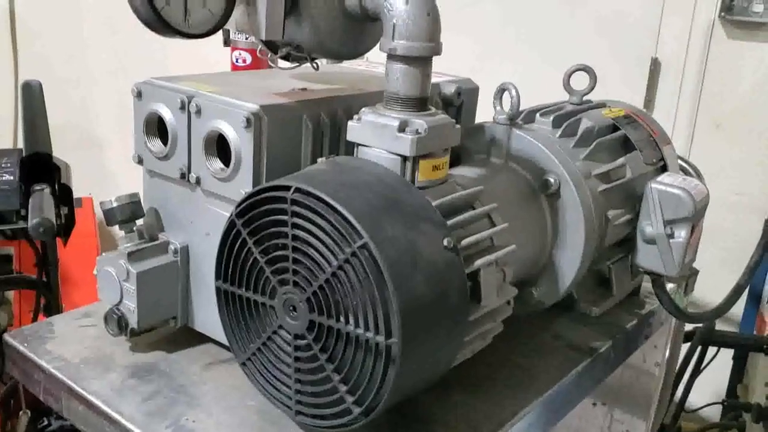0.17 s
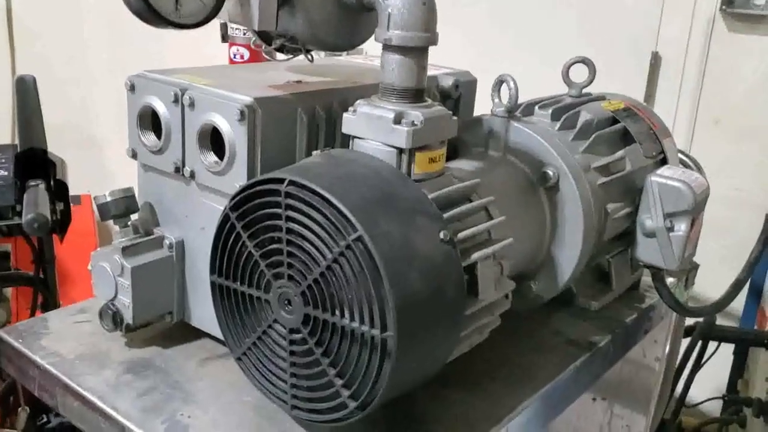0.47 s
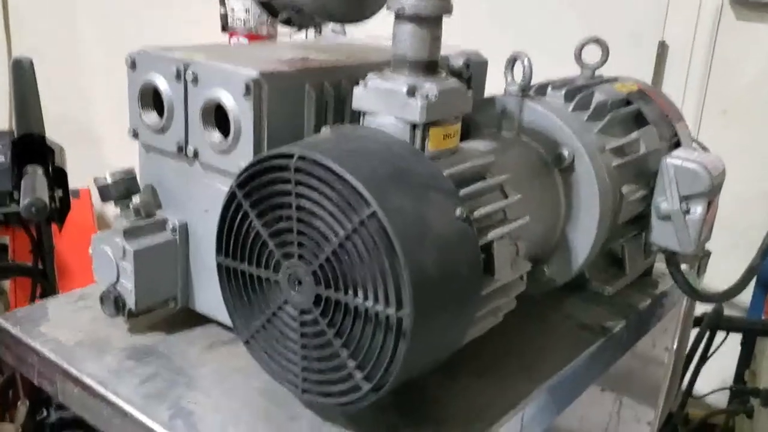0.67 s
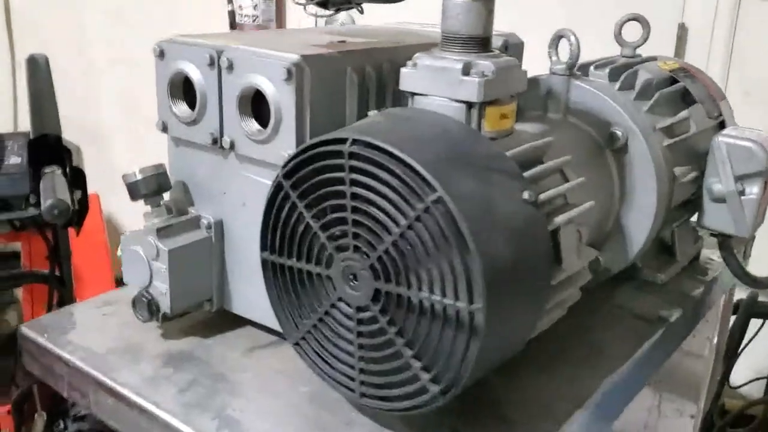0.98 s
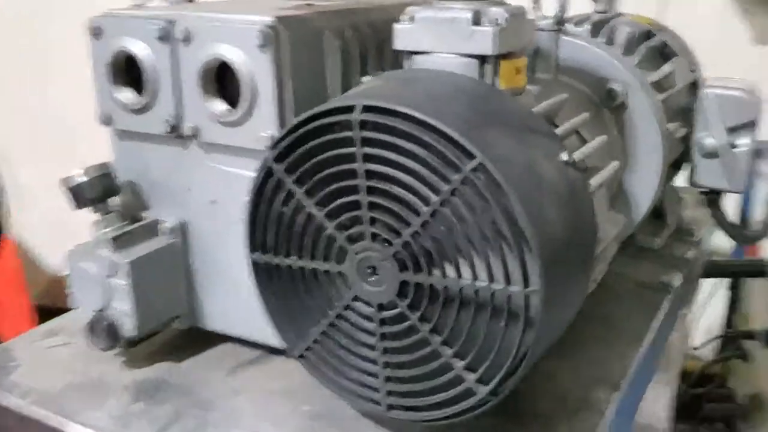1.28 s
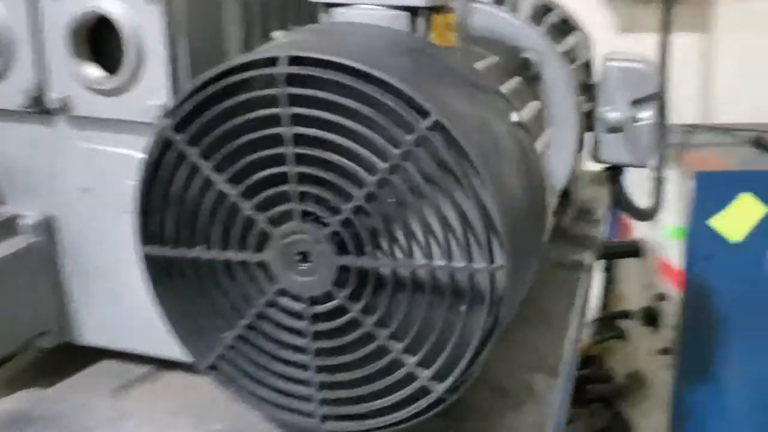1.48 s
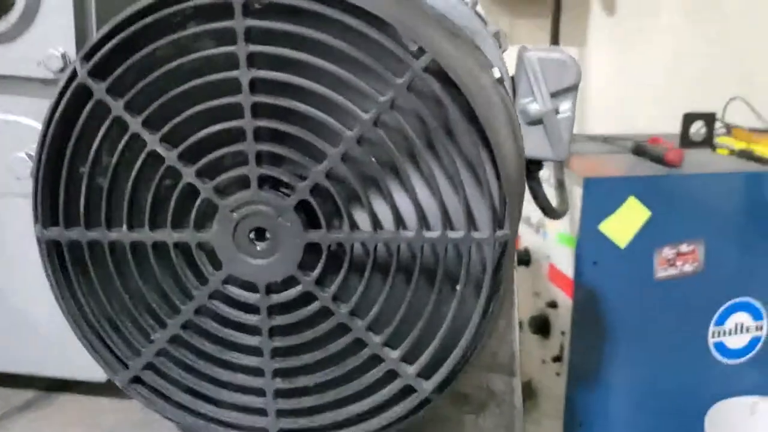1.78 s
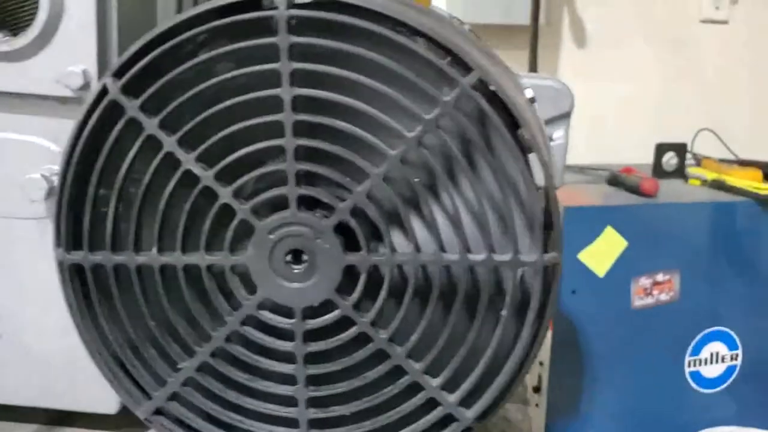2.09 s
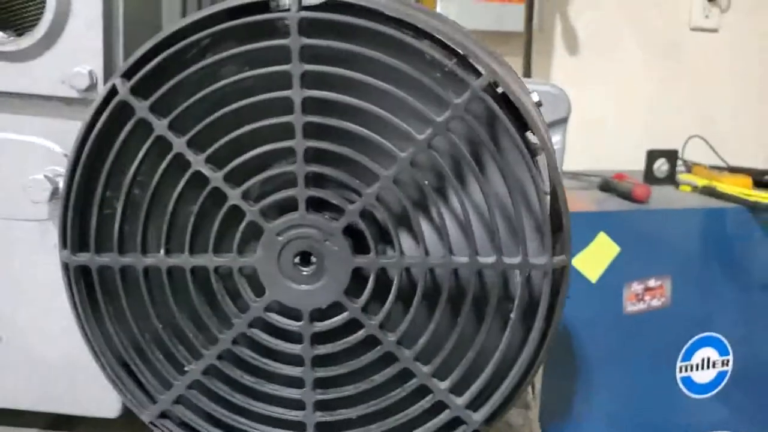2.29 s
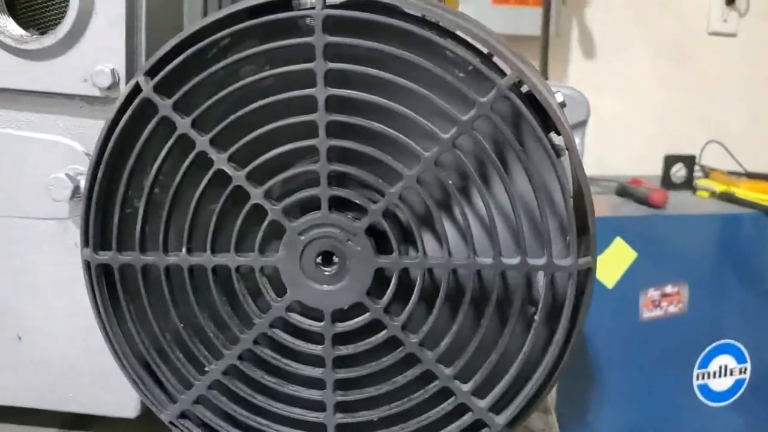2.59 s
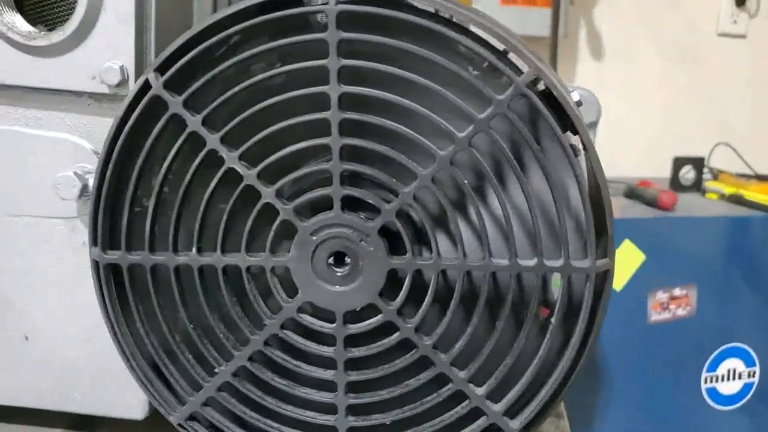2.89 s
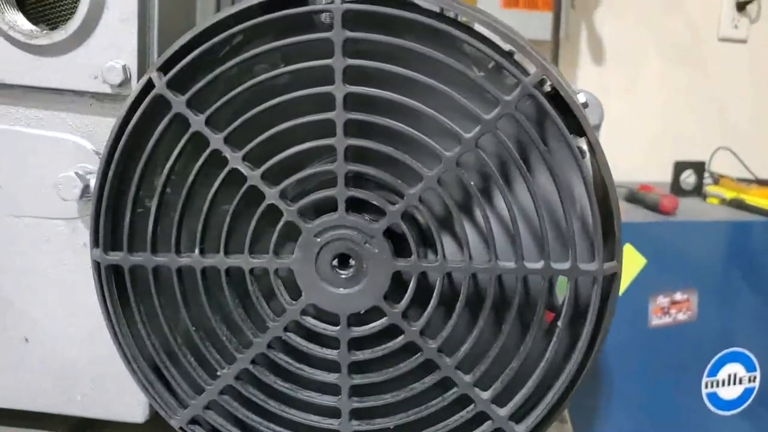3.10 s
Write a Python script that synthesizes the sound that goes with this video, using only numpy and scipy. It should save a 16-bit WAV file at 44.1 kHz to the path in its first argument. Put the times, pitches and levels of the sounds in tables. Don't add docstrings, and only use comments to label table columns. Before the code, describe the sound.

A vacuum pump, already running, starts abruptly at about 0.13 s: a steady mechanical drone, very rapid uneven vane knocks blurring into a metallic rattle, and dull rushing air in a live workshop. From about 1 to 2 s the microphone approaches the fan; whirring tones, casing ring and roar swell, leaning left. From 2 s to 3.2 s it stays loud and close, with turbulent fan air and little treble.

```python
import sys
import numpy as np
from scipy import signal
from scipy.fft import rfft, irfft
from scipy.io import wavfile
from scipy.ndimage import uniform_filter1d

SR = 44100
rng = np.random.default_rng(int(sys.argv[2]) if len(sys.argv) > 2 else 0)


def invert_db(x):
    u = np.asarray(x, float) / 20
    return 10 ** u


def waveform_to_disk(signal):
    frames = np.transpose(np.atleast_2d(signal))
    scaled = np.clip(frames, -1, 1) * 32767
    samples = np.round(scaled).astype(np.int16)
    wavfile.write(sys.argv[1], SR, samples)


N = 142884

# time_s, closeness (0 far - 1 near)
CLOSENESS = [(0.099, 0.19), (0.599, 0.16), (1.001, 0.26), (1.2, 0.42), (1.35, 0.56), (1.6, 0.84),
             (1.899, 0.89), (2.1, 0.95), (2.5, 0.99), (2.801, .97), (3.24, 0.94)]
# time_s, facing (0 aside - 1 facing)
FACING = [(.1, 0.), (1., 0.), (1.22, 0.52), (1.45, 0.77), (1.8, 0.88), (2.2, 0.88), (2.6, 0.87),
          (3.24, 0.96)]
# order (multiple of shaft rate), far_db, near_db, left_right_db
SHAFT_ORDERS = [(3, -55, -50, 0), (4, -66, -58, 1), (6, -56, -46, 1), (8, -54, -38, 5), (9, -47, -49, 1),
                (10, -61, -52, 2), (12, -51, -48, 2), (14, -58, -50, 3), (15, -55, -40, 2),
                (16, -49, -34.5, 4), (17, -49, -44, 6), (21, -55, -54, 5), (23, -52, -59, 4),
                (24, -41, -40, 6), (29, -51, -48, 5), (32, -42, -34.5, 4), (36, -51, -56, 3),
                (40, -44, -41, 2), (42, -49, -45, 5), (48, -52, -44, 3)]
# pitch_hz, far_db, near_db, left_right_db
MOTOR_TONES = [(71.7, -57, -53, 5.5), (81.7, -51, -52, -1.5), (93.6, -66.5, -61, -8),
               (980.9, -54.5, -45, 9), (2185, -55.5, -51.5, 15), (2910, -71, -75, -4.5)]
# place (0-1 turn), far_db, near_db
VANE_BLOWS = [
    (.02, -5, -8),
    (.425, 0, 0),
    (.79, -1.5, -3),
]
# time_s, level_db
SLAP = [(0.099, -1.), (.3, -2.5), (.45, 2.5), (.55, -4), (.67, 1.5), (.85, -1.5), (1.1, -1.5), (1.3, 2.5),
        (1.55, -2.5), (1.72, 2.5), (1.9, -4.5), (2.1, 2.5), (2.3, 0.5), (2.55, -0.5), (2.75, -1.5),
        (2.97, 0.5), (3.24, -1.5)]
# pitch_hz, width_hz, far_db, near_db, left_right_db
CASING_MODES = [(469, 170, -46, -35.5, 0.5), (722, 310, -40, -43, -4), (893, 94, -49, -47, -0.5),
                (1042, 90, -41, -65.5, 7), (1254, 154, -38, -36.5, 1.5), (1416, 60, -51, -41, -2),
                (1482, 96, -37, -35.5, 1.5), (1720, 74, -49, -46, 14), (1966, 81, -54, -44, -15.5),
                (2238, 99, -45, -36.5, 3.5), (2742, 180, -68.5, -58, 22), (3593, 1000, -47, -45.5, 5.5),
                (5230, 470, -70.5, -54, 19), (6100, 2000, -54, -51.5, 18)]
# pitch_hz, density_db (per Hz)
AIR_FAR = [(30, -27.5), (75, -19), (130, -12), (500, -9.5), (1500, -7.5), (2500, -17), (4600, -25.5),
           (6400, -23.5)]
# pitch_hz, density_db (per Hz)
AIR_NEAR = [(30, -20.5), (230, -9), (320, -18), (480, -12.5), (1200, -7), (2500, -17), (4600, -21.5),
            (6400, -26)]
# pitch_hz, likeness (0-1)
AIR_COHERENCE = [(60, 0.96), (170, 0.87), (470, 1), (1300, 1), (3640, 0.4), (10200, 0.03)]
# pitch_hz, left_right_db
AIR_BALANCE = [(40, 0.5), (110, -2.5), (250, 2.5), (600, 10), (1800, 6.5), (3300, 8.5), (5700, 7),
               (9000, 0.5)]
# pitch_hz, level_db
MIC_RESPONSE = [(6500, 0.5), (7000, -5.5), (7320, -15), (7500, -7), (8500, -5.5), (9700, -2), (9900, -4),
                (10080, -18)]

TIME_S = np.arange(N) / SR
START_S, SHAFT_HZ = 0.1272, 29.691
TONE_SPREAD_TURNS, WAVER_TURNS, WAVER_DB = 0.065, 0.02, 1.5
BLOW_JITTER_S, BLOW_S, BLOW_SPREAD_DB = 0.00012, 0.00029, 2.8
RATTLE, LOW_RATTLE, STRUCK_FROM_HZ = 0.55, 0.9, 1000
RATTLE_ALIKE, RING_ALIKE = 0.55, 0.72
SMACK_HZ, SMACK_WIDTH_HZ, SMACK_PAN_DB = 1495, 340, -1
SMACK_FAR_DB, SMACK_NEAR_DB = -42.5, -37
AIR_FAR_DB, AIR_NEAR_DB = -35, -24
PATCH_DB, GUST_DB, SWELL_DB, BLADE_CHOP = 2, 1.5, 0.4, 0.1
ROOM_T60_S, ROOM_GAP_S, ROOM_WIDE_HZ = 0.66, 0.006, 496
ROOM_FAR_DB, ROOM_NEAR_DB = -3, -5.5
GATE_FROM_HZ, GATE_BELOW_DB = 6950, -2.8


def blend(far, near, walk=CLOSENESS):
    t, close = np.transpose(walk)
    return far + (near - far) * np.interp(TIME_S, t, close)


def read(points, hz):
    f, value = np.transpose(points)
    return np.interp(np.log(hz + 1), np.log(f + 1), value)


def evened(x):
    return x / np.sqrt(np.mean(x ** 2) + 1e-20)


def drift(top_hz):
    t = np.arange(0, N, 256) / SR
    f = np.geomspace(0.3, top_hz, num=16)[:, None]
    waves = np.sin(2 * np.pi * (f * t + rng.random(f.shape))) / f ** 0.65
    return np.interp(TIME_S, t, evened(waves.sum(0)))


def sides(pan_db):
    return invert_db(np.array([[pan_db / 2], [-pan_db / 2]]))


def ring(x, hz, width_hz):
    r = np.exp(-np.pi * width_hz / SR)
    poles = [1, -2 * r * np.cos(2 * np.pi * hz / SR), r * r]
    once = signal.lfilter([1, 0, -1], poles, x)
    return evened(signal.lfilter([1, 0, -1], poles, once))


def tone(hz, far_db, near_db, pan_db):
    turns = hz * TIME_S + rng.random() + WAVER_TURNS * drift(6)
    lead = TONE_SPREAD_TURNS * rng.standard_normal() * np.array([[0.5], [-0.5]])
    level = invert_db(blend(far_db, near_db, FACING) + WAVER_DB * drift(17))
    return np.sqrt(2) * level * sides(pan_db) * np.sin(2 * np.pi * (turns + lead))


def rotor_tones():
    shaft = sum(tone(order * SHAFT_HZ, *rest) for order, *rest in SHAFT_ORDERS)
    return shaft + sum(tone(*row) for row in MOTOR_TONES)


def vane_blows():
    blows = np.zeros(N)
    turn = np.arange(int(N / SR * SHAFT_HZ) - 1)
    slap_db = blend(0, 0.94, SLAP)
    for place, far_db, near_db in VANE_BLOWS:
        jitter, spread = rng.standard_normal((2, len(turn)))
        blow_s = (turn + place) / SHAFT_HZ + BLOW_JITTER_S * jitter
        at = np.clip(blow_s * SR, 0, N - 1).astype(int)
        level_db = (blend(far_db, near_db) + slap_db)[at]
        blows[at] += invert_db(level_db + BLOW_SPREAD_DB * np.clip(spread, -2, 1.3))
    pulse = np.exp(-(np.arange(-40, 41) / SR / BLOW_S * 3) ** 2)
    return signal.oaconvolve(blows, pulse, "same")


def loose_rattle():
    left, other = rng.standard_normal((2, N))
    return np.array([left, RATTLE_ALIKE * left + np.sqrt(1 - RATTLE_ALIKE ** 2) * other])


def casing():
    blows, rattle = vane_blows(), loose_rattle()
    out = np.zeros((2, N))
    for hz, width_hz, far_db, near_db, pan_db in CASING_MODES:
        lag = int(rng.random() * (1 - RING_ALIKE) * SR / hz)
        both = np.array([blows, np.roll(blows, lag)])
        share = RATTLE if hz > STRUCK_FROM_HZ else LOW_RATTLE
        drive = np.sqrt(1 - share) * ring(both, 930, 2300) + np.sqrt(share) * rattle
        out += invert_db(blend(far_db, near_db)) * sides(pan_db) * ring(drive, hz, width_hz)
    smack = ring(blows, SMACK_HZ, SMACK_WIDTH_HZ)
    smack_gain = invert_db(blend(SMACK_FAR_DB, SMACK_NEAR_DB)) * sides(SMACK_PAN_DB)
    return out + smack_gain * np.array([smack, np.roll(smack, 5)])


def air_shape(points, hz):
    shape_db = read(points, hz)
    return shape_db - 20 * np.log10(np.linalg.norm(invert_db(shape_db[hz < 7000])))


def cooling_air():
    frames, hz = N // 256 + 5, np.fft.rfftfreq(1024, 1 / SR)
    a, b, c, d, patches = rng.standard_normal((frames, 513, 5)).T
    patches = evened(uniform_filter1d(uniform_filter1d(patches, 10, 0), 10, 1))
    at = np.minimum(np.arange(frames) * 256, N - 1)
    close = blend(0, 0.97)[at]
    field_db = np.outer(air_shape(AIR_FAR, hz) + AIR_FAR_DB, 1 - close)
    field_db += np.outer(air_shape(AIR_NEAR, hz) + AIR_NEAR_DB, close)
    field_db += PATCH_DB * patches + SWELL_DB * drift(4.6)[at]
    field_db += np.outer(np.exp(-hz / 70), GUST_DB * drift(17)[at])
    same = np.clip(read(AIR_COHERENCE, hz), -1, 1)[:, None]
    left = a + 1j * b
    right = same * left + np.sqrt(1 - same ** 2) * (c + 1j * d)
    z = np.array([left, right]) * invert_db(field_db)
    z *= invert_db(np.outer([0.5, -0.5], read(AIR_BALANCE, hz)))[:, :, None]
    roar = signal.istft(z, nperseg=1024, noverlap=768)[1][:, :N] / np.sqrt(3)
    return roar * (1 + BLADE_CHOP * np.sin(2 * np.pi * 8 * SHAFT_HZ * TIME_S))


def workshop(x):
    t = np.arange(SR // 2) / SR
    size = len(t)
    taps = rng.standard_normal((2, size)) * (rng.random((2, size)) < 0.1)
    taps *= invert_db(-60 * t / ROOM_T60_S) * (t > ROOM_GAP_S)
    running = np.tile(x, 2)[:, N - size:]
    wet = signal.fftconvolve(running, taps / np.linalg.norm(taps[0]), axes=1)[:, size:size + N]
    high_pass = signal.butter(1, ROOM_WIDE_HZ, "high", fs=SR, output="sos")
    wide = signal.sosfilt(high_pass, wet[1] - wet[0])
    share = invert_db(blend(ROOM_FAR_DB, ROOM_NEAR_DB))
    return (x + share * np.array([wet[0], wet[0] + wide])) / np.sqrt(1 + share ** 2)


def scene():
    return rotor_tones() + workshop(casing() + cooling_air())


def treble_gate(x):
    hz, t, z = signal.stft(x, SR, nperseg=2048, noverlap=1024)
    power = uniform_filter1d((abs(z) ** 2).mean(0), size=4, axis=0)
    usual = uniform_filter1d(uniform_filter1d(power, size=60, axis=0), size=9, axis=1)
    edge_hz = np.where(rng.random(len(t)) < 0.35, 10080, 9860)
    strong = power > usual * invert_db(2 * GATE_BELOW_DB)
    keep = (strong | (hz[:, None] < GATE_FROM_HZ)) & (hz[:, None] < edge_hz)
    return signal.istft(z * keep, SR, nperseg=2048, noverlap=1024)[1][:, :N]


def top_cut(x):
    return signal.sosfilt(signal.butter(12, 10760, fs=SR, output="sos"), x)


def record(dry):
    hz = np.fft.rfftfreq(N, 1 / SR)
    heard = irfft(rfft(treble_gate(dry)) * invert_db(read(MIC_RESPONSE, hz)), N)
    mix = heard * np.clip((TIME_S - START_S) / 0.0013, 0, 1)
    return top_cut(mix)


dry = scene()
out = record(dry)
waveform_to_disk(out)
```